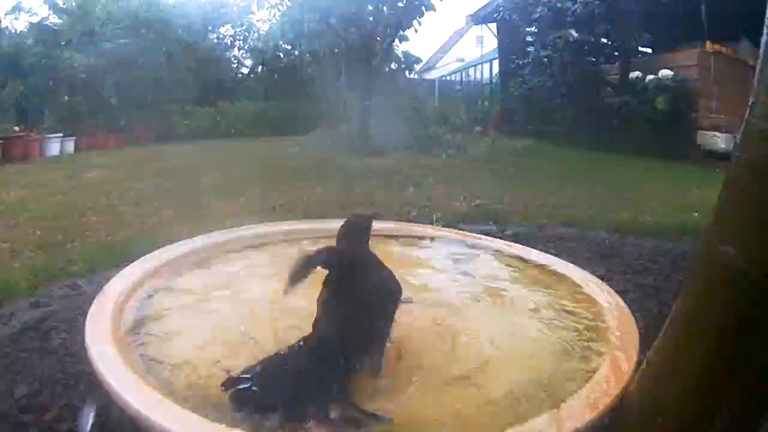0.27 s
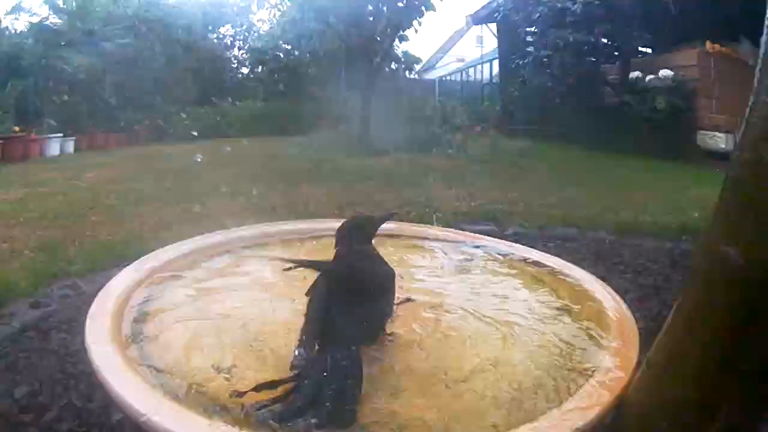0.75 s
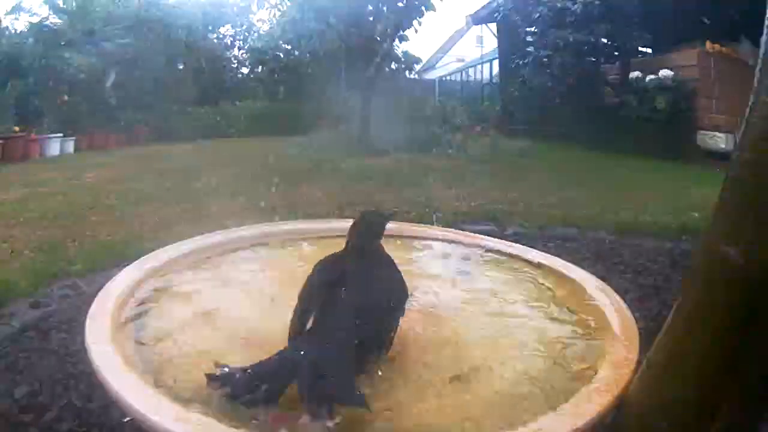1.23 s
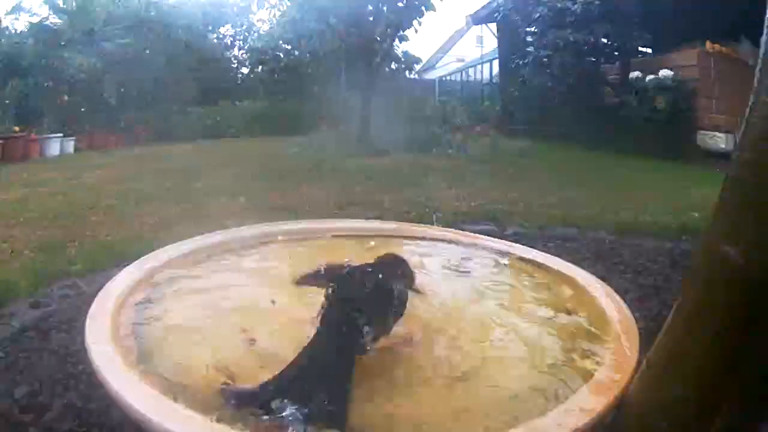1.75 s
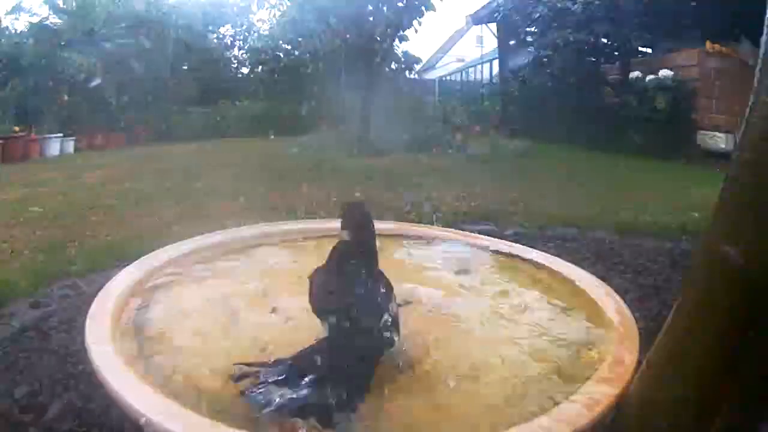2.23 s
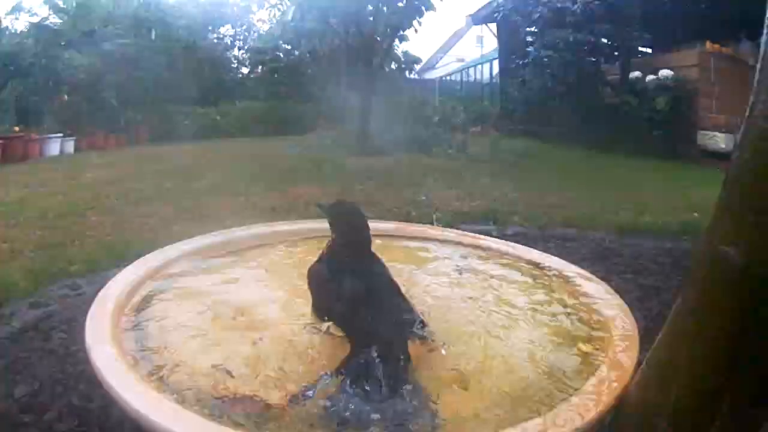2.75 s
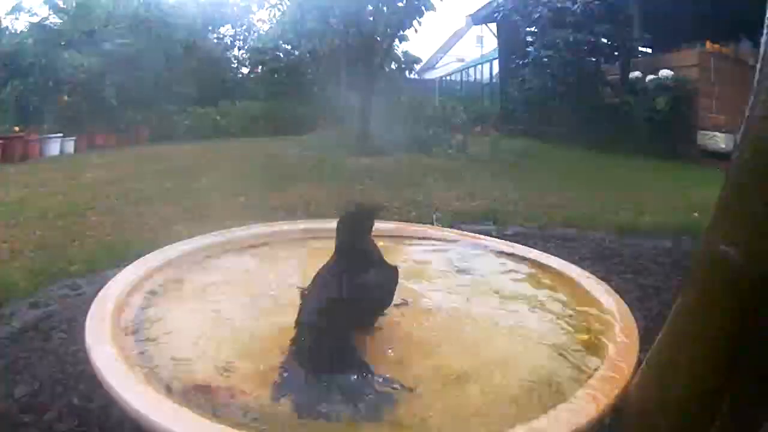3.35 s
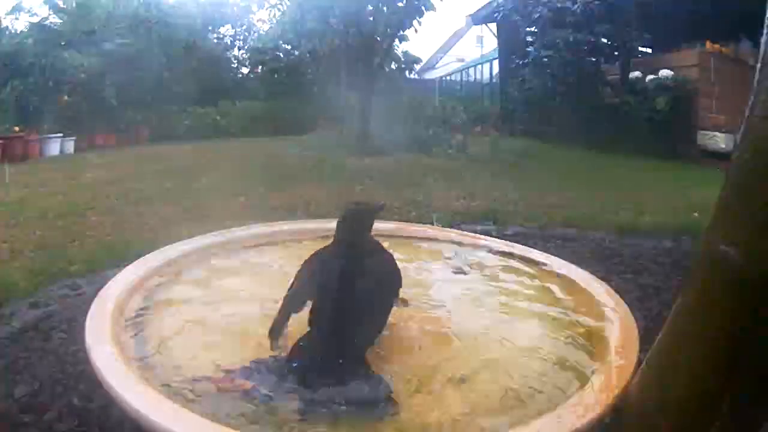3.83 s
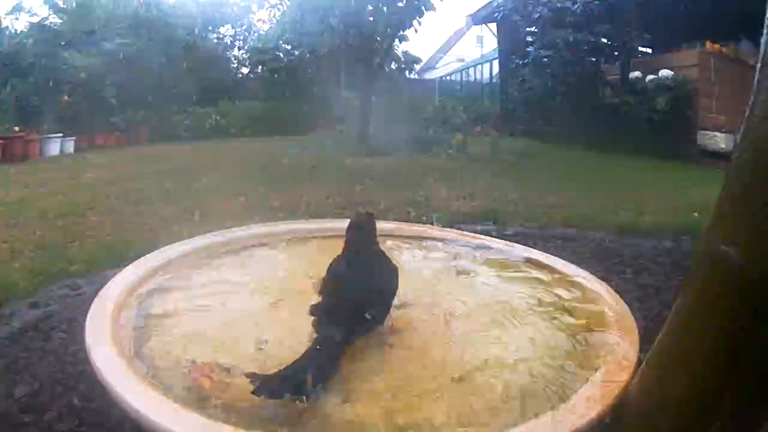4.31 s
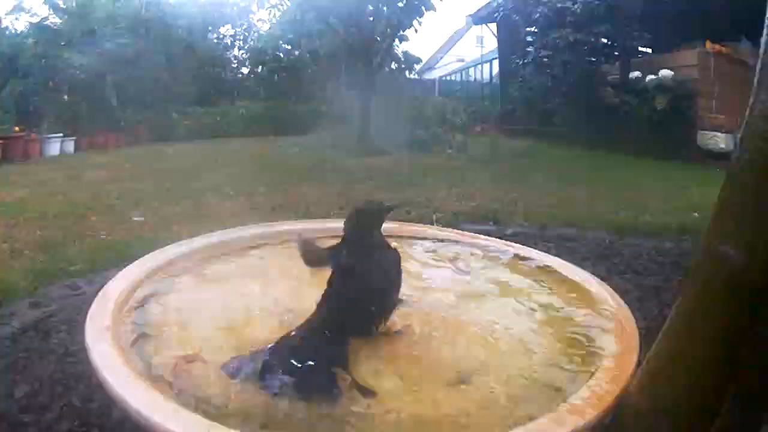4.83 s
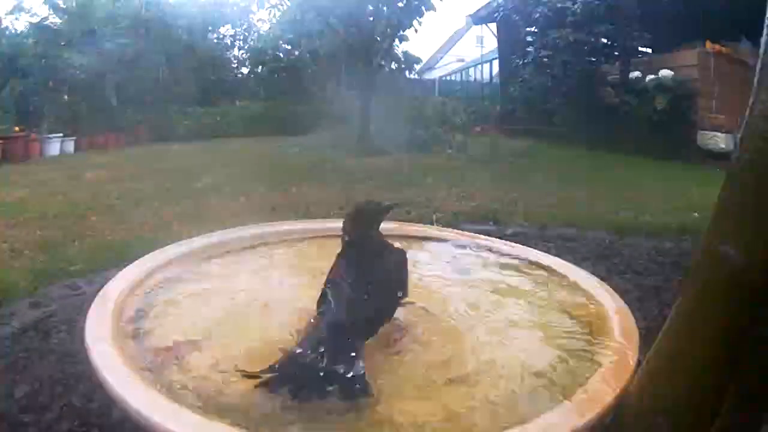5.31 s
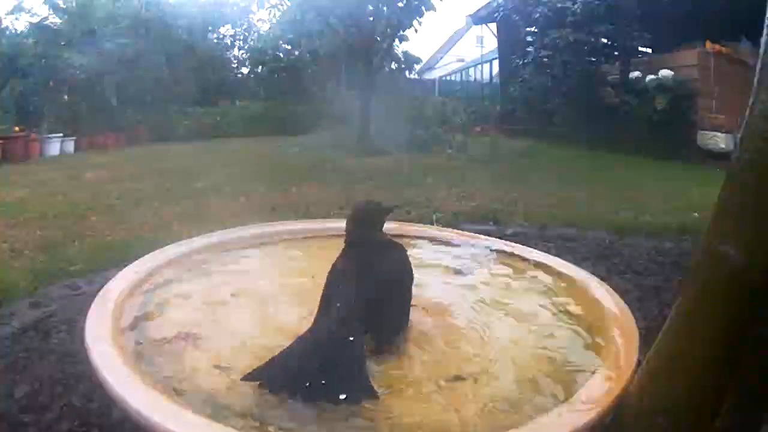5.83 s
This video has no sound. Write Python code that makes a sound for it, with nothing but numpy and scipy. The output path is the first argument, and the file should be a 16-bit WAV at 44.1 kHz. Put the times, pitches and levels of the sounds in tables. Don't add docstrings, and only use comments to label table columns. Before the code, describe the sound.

Close, crisp wing slaps and scattering drops as a bird bathes, strongest mid-way, with fine rain hissing and pattering around.

```python
import sys
import numpy as np
from scipy import signal
from scipy.fft import rfft, irfft
from scipy.io import wavfile
from scipy.ndimage import uniform_filter1d

SR = 44100
rng = np.random.default_rng(int(sys.argv[2]) if len(sys.argv) > 2 else 0)


def int16_out(signal):
    q = np.round(np.clip(np.atleast_2d(signal).T, -1, 1) * 32767)
    wavfile.write(sys.argv[1], SR, q.astype(np.int16))


def magnitude_from_level(level_db):
    exponent = np.asarray(level_db, float) / 20
    return 10 ** exponent


N = 267246

# (t/s, treble level/dB, treble f/Hz, body level/dB)
GENTLE_SLAPS = [(0.1123, -38.5, 5180, -38), (0.2014, -20.5, 5730, -31.5), (.298, -27.5, 4990, -33.5),
                (0.424, -41.5, 5450, -32.5), (0.4543, -34, 5600, -38.5), (0.4582, -20.5, 5160, -34.5),
                (0.582, -34.5, 5460, -34), (0.6788, -31, 5600, -34.5), (0.885, -39.5, 4730, -40),
                (.9262, -43.5, 6030, -31.5), (0.9917, -32, 4200, -27.5), (1.1204, -34.5, 5630, -33),
                (1.2111, -19, 5800, -30.5), (1.31, -21.5, 5300, -46), (1.3735, -32.5, 5420, -34.5),
                (1.4218, -23, 3830, -36.5), (1.511, -28.5, 4230, -36), (4.5158, -32, 3400, -34),
                (4.599, -19.5, 5900, -29.5), (4.783, -17.5, 5150, -27), (4.7903, -32, 3380, -38),
                (4.883, -31.5, 6270, -27.5), (5.0048, -28, 4950, -31), (5.1111, -23.5, 4660, -30.5),
                (5.7078, -39, 3300, -29)]
# (t/s, treble level/dB, treble f/Hz, body level/dB)
HARD_SLAPS = [(2.078, -23.5, 6060, -35), (2.1594, -26.5, 4320, -33), (2.243, -19.5, 5450, -46),
              (2.2644, -23.5, 5500, -33.5), (2.348, -11.5, 6100, -21.5), (2.4305, -10.5, 7010, -24),
              (2.5096, -14.5, 5850, -26.5), (2.5914, -11, 4320, -24.5), (2.6745, -10, 4980, -22.5),
              (2.7632, -21, 4320, -27.5), (2.8618, -21.5, 3850, -35), (2.9911, -35, 5150, -30),
              (3.071, -23.5, 4000, -26.5), (3.0762, -29, 6500, -32), (3.0873, -17, 5900, -31.5),
              (3.1512, -22, 5500, -29.5), (3.2268, -39, 3360, -26), (3.235, -14.5, 6820, -29.5),
              (3.3244, -19.5, 4770, -32.5), (3.4081, -22.5, 5830, -30), (3.5082, -14.5, 6100, -34.5),
              (3.509, -28.5, 4900, -31), (3.5328, -34, 3400, -36)]
GENTLE_SLAP_MS, HARD_SLAP_MS = 1.18, 1
# (t/s, level/dB, f/Hz, length/ms)
GENTLE_DROPS = [(0.1178, -32, 6600, 0.83), (0.1316, -32.5, 3600, 1.05), (0.3766, -20, 4770, 1.2),
                (.388, -32.5, 7100, 1.9), (0.4788, -20, 6500, 0.71), (.483, -39, 5220, 2.4),
                (0.784, -32, 6570, 0.88), (1.196, -36.5, 5300, 4.6), (1.2843, -21.5, 5420, 0.32),
                (1.2918, -22.5, 6300, 0.84), (1.3042, -33.5, 6400, 2), (1.3132, -26, 6150, 0.64),
                (1.3943, -25.5, 5970, 0.67), (1.4296, -36.5, 6570, 5.7), (1.4353, -33, 3990, 2.5),
                (3.895, -19, 6300, 0.74), (4.335, -32, 5800, .81), (4.3372, -26.5, 7200, 1.3),
                (4.368, -25.5, 5400, 0.74), (4.415, -27.5, 6100, .9), (4.6698, -18, 6360, 0.57),
                (4.6936, -25.5, 6050, 1.1), (4.7, -37, 6500, 2.3), (4.8934, -16.5, 6100, 1.1),
                (5.019, -28, 3790, 1), (5.218, -26.5, 6030, 2.6), (5.3388, -24.5, 5480, 0.9),
                (5.3471, -28.5, 5500, 0.98), (5.4784, -27.5, 4980, 0.61), (5.489, -26.5, 5450, 0.58)]
# (t/s, level/dB, f/Hz, length/ms)
HARD_DROPS = [(1.812, -29, 5660, 1.6), (1.8933, -30.5, 4060, 0.57), (2.1775, -31.5, 5350, 2.5),
              (2.2384, -21.5, 5040, 0.81), (2.2458, -14.5, 5530, 0.67), (2.3519, -25.5, 5820, 1.2),
              (2.4183, -22, 5840, 0.67), (2.436, -37.5, 5790, 0.77), (2.597, -28.5, 6530, 1.1),
              (2.6056, -30.5, 4260, 1.4), (2.6877, -35.5, 4320, 1.3), (3.0754, -22.5, 6020, 2.3),
              (3.154, -21.5, 6150, 3.2), (3.157, -27.5, 4800, 1.6), (3.198, -30, 4270, 0.5),
              (3.237, -30, 5900, 2.3), (3.412, -21.5, 4860, 0.69), (3.4136, -18, 7170, 1.4)]
# (t/s, level/dB, f/Hz,
# length/ms)
STRAY_DROPS = [(.133, -35.5, 7000, .8), (1.1877, -34, 5300, .6), (1.2158, -35, 4500, 1.1),
               (1.2835, -23.5, 3300, .9), (1.287, -34, 5500, 0.5), (1.3086, -28.5, 6300, 1.3),
               (1.328, -40, 4100, .8), (2.225, -35.5, 2500, 1), (2.2655, -23, 6000, 1.5),
               (2.267, -32.5, 4500, 1.1), (2.333, -33, 3800, .9), (2.438, -33, 6000, 1),
               (2.439, -34, 5000, 0.91), (2.4632, -30.5, 3800, 0.54), (2.5085, -20.5, 2400, 0.65),
               (2.627, -36, 2600, 1), (2.624, -34.5, 7200, 1.1), (3.0905, -31.5, 3400, 1.3),
               (3.1094, -28, 3250, 1.2), (3.2282, -27, 3300, 1), (3.2329, -30.5, 4500, 0.5),
               (3.247, -32.5, 3000, .6), (3.408, -31.5, 1300, 0.63), (4.258, -32, 2000, .8),
               (4.276, -33.5, 3700, 1.1), (4.313, -36, 1600, 1.2), (4.374, -30, 6300, 1.3),
               (4.429, -33.5, 4300, 0.74), (4.697, -28, 4700, 1.3), (4.743, -34.5, 2300, 0.57),
               (4.76, -35.5, 7600, 0.87), (4.772, -32.5, 4000, 0.8), (4.7836, -18, 2800, 0.51),
               (4.826, -36.5, 2200, 2.5),
               (.215, -38.5, 5040, .8), (.282, -33.5, 3500, 1), (.315, -38.5, 5500, 1.5),
                 (.508, -38, 1300, 1), (.629, -35.5, 2800, .5), (.648, -35, 2700, 1),
                 (.7335, -35, 2500, .6), (.739, -37, 3750, 1), (.802, -35, 1080, 1.2),
                 (.824, -42, 7400, .7), (.833, -43, 3700, .8), (.899, -37, 2700, .8),
                 (1.006, -34, 6220, .6), (1.003, -37, 2500, 1.5), (1.028, -40, 3530, 2.5),
                 (1.052, -38.5, 3500, 1), (1.147, -40, 1700, 1.5), (1.399, -30, 4300, .8),
                 (1.539, -36, 3500, 1), (1.542, -32.5, 6250, 1), (1.549, -35, 5350, .8),
                 (1.565, -38, 3300, .8), (1.617, -38, 5520, .7), (1.677, -36, 6500, .7),
                 (1.72, -34.5, 3400, .7), (1.776, -39.5, 7500, .8), (1.79, -38, 5030, .8),
                 (1.842, -31.5, 7650, .8), (1.867, -31.5, 4820, 1), (1.899, -29, 2510, .6),
                 (1.983, -36, 4300, .7), (2.364, -32.5, 5760, 1), (2.774, -34, 1200, 1),
                 (2.965, -35, 2500, 2), (2.987, -35, 5500, 1), (3.448, -35.5, 2520, 1.5),
                 (3.454, -34, 1900, .8), (5.024, -37.5, 895, 1.2), (5.05, -39.5, 7050, .7),
                 (5.186, -31.5, 6880, .7), (5.534, -35, 3400, 1), (5.695, -37.5, 7620, .6),
                 (5.91, -42, 3800, .6), (5.934, -39.5, 4000, .8), (6.003, -36.5, 2780, .6)]
DROP_BODY_DB = -18.5
SLAP_OCTAVES, DROP_OCTAVES = 0.77, 0.22

# (t/s, level/dB, rise/ms, fall/ms)
GENTLE_SPRAY = [(.111, -31.5, 3.9, 5.1), (.198, -33.5, 8.5, 19), (.293, -38, 3.6, 9.2),
                (.373, -28, 1.5, 14), (0.474, -28, 8.3, 13), (.579, -32, 2.4, 7.9), (.677, -27.5, 5.6, 2.2),
                (0.774, -36, 17, 4.9), (0.881, -33.5, 3.6, 5), (1.116, -34.5, 5.2, 8.8),
                (1.209, -30, 5, 11), (1.3, -32, 8.1, 20), (1.391, -36.5, 9.3, 5.2), (4.331, -37.5, 11, 12),
                (4.598, -34, 5.8, 7.9), (4.688, -30.5, 11, 15), (4.771, -33, 12, 17),
                (4.876, -36.5, 4.1, 16), (4.992, -38, 5.6, 2.7), (5.003, -37, 4.3, 3.8),
                (5.104, -30.5, 5, 5.8), (5.216, -29.5, 3.3, 7.7), (5.339, -30, 4.9, 14),
                (5.484, -34, 2.8, 2)]
# (t/s, level/dB, rise/ms, fall/ms)
HARD_SPRAY = [(1.81, -37, 4.4, 10), (2.157, -42, 5.3, 9.8), (2.168, -34, 6, 23), (2.24, -36, 31, 10),
              (2.325, -38, 11, 7.1), (2.349, -36, 2, 16), (2.418, -32, 20, 14), (2.504, -29, 9.1, 9.8),
              (2.591, -33.5, 2.2, 12.5), (2.661, -37, 5.1, 7.5), (2.674, -31, 2.1, 21),
              (2.753, -32.5, 12, 17), (2.985, -32.5, 5.8, 8), (3.047, -39, 50, 32), (3.149, -28, 3, 11),
              (3.303, -34.5, 6.5, 10), (3.32, -31.5, 3.3, 10), (3.406, -32, 4.3, 9.3),
              (3.505, -35.5, 6.1, 13)]
# (t/s, level/dB, rise/ms, fall/ms)
COARSE_SPRAY = [
    (1.265, -37, 7.8, 29),
    (1.893, -34.5, 2.4, 3.6),
    (3.042, -36.5, 19, 27),
    (2.861, -31, 4.8, 10),
    (3.185, -34, 28, 62),
    (3.355, -37, 23, 28),
    (4.366, -37, 2.7, 10),
]
FINE_HZ, COARSE_HZ = 5500, 3700

# (t/s, peak level/dB, f/Hz, t60/s, glide over the
BUBBLES = [(0.076, -41, 2100, .04, 6), (0.9882, -43, 2190, 0.018, 0.5), (1.217, -23.5, 3090, 0.0057, -0.5),
           (1.269, -37, 3700, 0.013, -5.5), (1.277, -39.5, 2270, 0.049, 0), (1.27, -45, 2400, 0.04, -2),
           (1.3018, -38.5, 1900, 0.052, 3.5), (2.244, -42, 2520, 0.062, -0.5),
           (2.2645, -25, 2750, 0.016, .6), (3.2608, -43.5, 3500, .025, 5.2),
           (2.3475, -20, 1850, 0.0088, 0.8), (2.43, -17, 1700, 0.0076, 1), (.55, -41.5, 730, 0.028, 0.5),
           (1.8954, -32, 3830, 0.013, .2), (2.806, -36.5, 3800, .015, -0.1),
           (3.1497, -31, 1200, 0.015, 0.5), (3.5069, -21, 2000, 0.0061, 0), (3.0712, -20, 2600, .006, 0),
           (5.3468, -28, 5000, .008, 0), (5.7065, -31, 1800, .01, .3), (2.763, -27, 4000, .007, 0),
           (4.7828, -25, 2300, .006, 0), (2.5912, -21, 3700, .006, 0), (2.4625, -35, 2400, 0.029, -1.1),
           (3.1076, -39, 1350, 0.024, -3.5), (3.1088, -26.5, 1600, 0.014, -0.5),
           (3.2256, -25.5, 1563, 0.024, 0.9), (4.3666, -25, 2800, 0.012, 2.5),
           (4.6943, -37, 2150, 0.023, 0.8), (5.077, -41, 1300, 0.033, 4), (5.3588, -29.5, 3300, 0.0075, 0),
           (5.706, -31.5, 2400, 0.012, 3), (4.26, -39.5, 780, 0.022, 1.5),
           (5.24, -34.5, 5150, 0.0068, -4.5), (5.983, -36, 6100, 0.0073, -1.5),
           (3.4215, -34.5, 3670, 0.0094, 1), (4.669, -30.5, 3150, 0.011, .5)]

# (crest t/s, crest f/Hz, peak level/dB, rise/ms, fall/ms)
LOW_FEATHER = [
    (.0568, 3100, -21, 10.5, 17.5),
    (2.483, 2720, -25, 8.5, 12.5),
    (2.7006, 2900, -21.5, 1.6, 8),
    (2.8693, 2750, -19.5, 13, 11.5),
    (3.054, 2780, -16.5, 9, 12.5),
    (3.2027, 2900, -17, 7.5, 10.5),
    (3.3666, 3050, -16.5, 1.6, 12.5),
]
# (crest t/s, crest f/Hz, peak level/dB,
# rise/ms, fall/ms)
HIGH_FEATHER = [
    (2.4848, 3350, -28, 4.2, 15),
    (2.702, 3400, -23, 6.2, 14),
    (2.8733, 3200, -20.5, 3.6, 15.5),
    (3.057, 3000, -19.5, 2.4, 18),
    (3.2037, 3750, -17, 4.2, 26),
    (3.3653, 3550, -20, 3.4, 20),
]
LOW_END_HZ, HIGH_END_HZ = 1210, 1720
# (crest t/s, crest f/Hz, peak level/dB,
# rise/ms, fall/ms)
FLICKS = [(.0585, 3790, -18.5, 4.6, 6.5), (0.067, 3300, -22, 5.3, 6.7), (0.0546, 6340, -16, 2, 6.1),
          (.0585, 6760, -17, 4.1, 6), (2.508, 2140, -33, 9, 2), (2.6964, 2470, -19, 4.2, 2),
          (2.719, 2400, -29, 4.4, 1.7), (3.3624, 2710, -17, 2.7, 2.4), (3.387, 3000, -25, 4.4, 4.5),
          (.067, 6200, -28, 2.8, 2), (2.692, 2850, -37, 3, 1.5), (3.0795, 2150, -31, 5, 1.5),
          (3.2, 4700, -31, 3, 1.5), (3.2075, 4800, -30.5, 4, 4), (3.359, 3100, -32, 1.5, 2),
          (3.39, 1530, -24, 2.5, 1.5), (3.2008, 2650, -20, 2, 2), (3.371, 5100, -24, 2, 8)]
FLICK_SAG_OCT_PER_MS = 0.085

# (t/s, peak level/dB, length/ms)
PUFFS = [(2.073, -33, 6.4), (2.265, -32, 2.4), (2.349, -32.5, 2.9), (2.431, -25.5, 4.6), (2.51, -23.5, 2.3),
         (2.583, -37, 11), (2.592, -25.5, 1.8), (2.664, -31.5, 5.4), (2.674, -27, 1.8), (2.762, -30.5, 1.4),
         (3.069, -32.5, 4), (3.084, -24.5, 2.4), (3.102, -28.5, 3.2), (3.152, -34, 4.6), (3.398, -36, 7.5),
         (3.409, -28, 5.1), (4.2888, -15, 1.08), (4.288, -36, 7), (4.779, -30, 5.3)]

# (f/Hz, level/dB per Hz)
RAIN = [(25, -1.5), (97, -2), (123, -6.5), (198, -7), (360, -12.5), (490, -13), (1080, -9.5), (7400, -13)]
RAIN_DB = -43
# (f/Hz, width/Hz, level/dB)
HUM = [
    (92, 61, -63.5),
    (200.7, 11, -63),
]

CAMERA_HZ = 16000
# (f/Hz, level/dB)
PLAYBACK_FILTER = [(6900, 0), (7500, -1), (8000, -5.5), (8500, -15), (8900, -31), (9200, -51.5),
                   (9500, -88.5)]


def add(out, s, sound):
    i = max(int(s * SR), 0)
    out[i:i + len(sound)] += sound[:len(out) - i]


def band(noise, hz, octaves):
    f = np.maximum(np.fft.rfftfreq(len(noise), 1 / SR), 1)
    bell = np.exp(-0.5 * (np.log2(f / hz) / octaves) ** 2)
    y = irfft(rfft(noise) * bell, len(noise))
    return y / np.std(y)


def walk(rate):
    k = int(SR / rate)
    held = np.repeat(rng.standard_normal(N // k + 1), k)
    return 1.14 * uniform_filter1d(uniform_filter1d(held, k), k)[:N]


def patter(chance, per_s, spread_db):
    size_db = -spread_db * np.log(np.abs(2 * chance[1] - 1) + 0.006)
    lands = chance[0] < per_s / SR
    return lands * np.sign(chance[1] - 0.5) * magnitude_from_level(size_db)


def slaps():
    out = np.zeros(N)
    ms = (np.arange(1024) - 256) * 1000 / SR
    rows = [(*row, GENTLE_SLAP_MS, SLAP_OCTAVES) for row in GENTLE_SLAPS]
    rows += [(*row, HARD_SLAP_MS, SLAP_OCTAVES) for row in HARD_SLAPS]
    for s, db, hz, length in GENTLE_DROPS + HARD_DROPS + STRAY_DROPS:
        rows.append((s, db, hz, db + DROP_BODY_DB, length, DROP_OCTAVES))
    noises = rng.standard_normal((len(rows), 2, 1024))
    for (s, treble_db, hz, body_db, length, width), noise in zip(rows, noises):
        hit = noise + (ms == 0) * np.array([[1.8], [7.0]]) / length
        layers = ((treble_db, hz, width, length, hit[0]),
                  (body_db, 1900, 0.55, length + 0.13, hit[1]),
                  (body_db - 13, 650, 0.6, length + 1.8, hit[1]))
        for db, centre, octaves, long, source in layers:
            shape = np.exp(np.where(ms < 0, ms / (0.33 * long), -ms / (0.7 * long)))
            crack = shape * band(source, centre, octaves)
            gain = np.sqrt(long * SR / 1000 / np.sum(crack ** 2))
            add(out, s - 256 / SR, magnitude_from_level(db - 2.0) * crack * gain)
    return out


def spray():
    out = np.zeros(N)
    ms = np.arange(4096) * 1000 / SR
    rows = [(FINE_HZ, *row) for row in GENTLE_SPRAY + HARD_SPRAY]
    rows += [(COARSE_HZ, *row) for row in COARSE_SPRAY]
    for (hz, s, db, rise, fall), chance in zip(rows, rng.random((len(rows), 2, 4096))):
        drops = patter(chance, 9000, 0.66)
        shape = np.where(ms < rise, (ms / rise) ** 0.52, np.exp(-1.6 * (ms - rise) / fall))
        wash = magnitude_from_level(-7) * band(drops[::-1], 1800, 0.8)
        add(out, s, magnitude_from_level(db - 1.5) * shape * (band(drops, hz, 0.5) + wash))
    return out


def bubbles():
    out = np.zeros(N)
    t = np.arange(1500) / SR
    for s, db, hz, t60, glide in BUBBLES:
        pitch = np.minimum(hz * 2 ** (glide * t / t60), 0.4 * SR)
        decay = np.exp(-np.log(1000) * t / t60)
        ring = np.sin(2 * np.pi * np.cumsum(pitch) / SR) * decay
        add(out, s, magnitude_from_level(db + 8.5) * ring * np.minimum(t / 0.00056, 1))
    return out


def whistles():
    out = np.zeros(N)
    rows = [(*row, LOW_END_HZ) for row in LOW_FEATHER]
    rows += [(*row, HIGH_END_HZ) for row in HIGH_FEATHER]
    for s, hz, db, rise, fall in FLICKS:
        rows.append((s, hz, db, rise, fall, hz * 2 ** (-FLICK_SAG_OCT_PER_MS * fall)))
    noises = rng.standard_normal((len(rows), 2, 2048))
    for (s, crest_hz, db, rise, fall, end_hz), noise in zip(rows, noises):
        ms = np.arange(-rise, fall, 1000 / SR)
        stroke = np.where(ms < 0, -ms / rise, ms / fall)
        slowing = end_hz + (crest_hz - end_hz) * (1 - stroke) ** max(fall / 8.6, 1)
        arch = np.where(ms < 0, crest_hz + 170 * ms, slowing)
        hz = uniform_filter1d(arch, size=175, mode="nearest")
        waver = 1 + 0.006 * band(noise[0], 300, 0.99)[:len(ms)]
        phase = 2 * np.pi * np.cumsum(hz * waver) / SR
        flutter = magnitude_from_level(2.2 * band(noise[1], 200, 0.8)[:len(ms)])
        fade = np.where(ms < 0, magnitude_from_level(-13 * stroke ** 0.81), magnitude_from_level(-4 * stroke))
        fade = fade * np.minimum(4 * (1 - stroke), 1)
        resonance = 1 / np.sqrt(1 + (np.log2(hz / 2480) / 0.24) ** 2)
        tone = np.sin(phase) + magnitude_from_level(-25.5) * np.sin(2 * phase)
        add(out, s - rise / 1000, magnitude_from_level(db) * fade * resonance * flutter * tone)
    return out


def puffs():
    out = np.zeros(N)
    ms = (np.arange(2048) - 512) * 1000 / SR
    for s, db, length in PUFFS:
        push = np.exp(-np.abs(ms / (0.28 * length)) ** 2)
        rebound = 0.36 * np.exp(-((ms - 0.8 * length) / (0.75 * length)) ** 2)
        add(out, s - 512 / SR, magnitude_from_level(db) * (push - rebound))
    return out


def rain():
    out = 0
    swell_db = 0.5 * walk(6)
    hz, db = np.transpose(RAIN)
    shared_drops = patter(rng.random((2, N)), 450, 2.2)
    for centre in 30 * 2 ** np.arange(0, 8.3, 0.5):
        level_db = np.interp(np.log(min(centre, 7000)), np.log(hz), db) + 10 * np.log10(centre)
        share = np.clip(0.47 * centre / (centre + 900), 0, 1)
        near = shared_drops * (rng.random(N) < 0.3) + patter(rng.random((2, N)), 200, 2.9)
        hiss = np.sqrt(1 - share) * rng.standard_normal(N)
        mix = hiss + np.sqrt(share) * near / np.std(near)
        flicker_db = (1.5 + 150 / (centre + 100)) * walk(14)
        out = out + magnitude_from_level(level_db + swell_db + flicker_db) * band(mix, centre, 0.33)
    return magnitude_from_level(RAIN_DB) * out / np.std(out)


def machinery():
    return sum(magnitude_from_level(db) * band(rng.standard_normal(N), f, 0.47 * width / f) for f, width, db in HUM)


def scene():
    bird = slaps() + spray() + bubbles() + whistles()
    echo = magnitude_from_level(-26.5) * np.roll(bird, 150)
    return (bird + echo + puffs() + rain() + machinery())[None]


def low_pass(x):
    return signal.sosfilt(signal.butter(12, 9140, fs=SR, output="sos"), x)


def record(dry):
    rounded = np.tanh(1.693 * dry[0]) / 1.715
    spectrum, f = rfft(rounded), np.fft.rfftfreq(N, 1 / SR)
    half = np.searchsorted(f, CAMERA_HZ / 2)
    spectrum[half:2 * half] = np.conj(spectrum[half:0:-1])
    spectrum *= magnitude_from_level(np.interp(f, *np.transpose(PLAYBACK_FILTER)))
    top = irfft(spectrum * np.clip((f - 7200) / 600, 0, 1), N)
    power = uniform_filter1d(uniform_filter1d(top ** 2, size=300), size=300)
    quiet = 1 / (1 + power / np.median(top ** 2) / 12)
    top_gain = magnitude_from_level(quiet * (3.0 * walk(70) - 2.5))
    played = irfft(spectrum, N) + (top_gain - 1) * top
    return low_pass(played[None])


dry = scene()
out = record(dry)
int16_out(out)
```